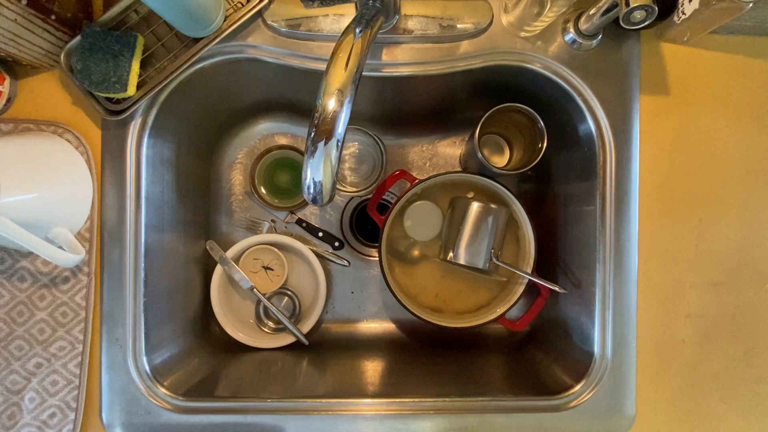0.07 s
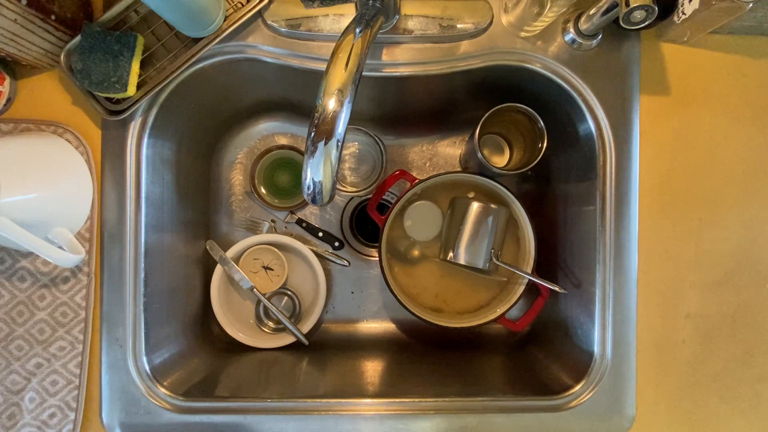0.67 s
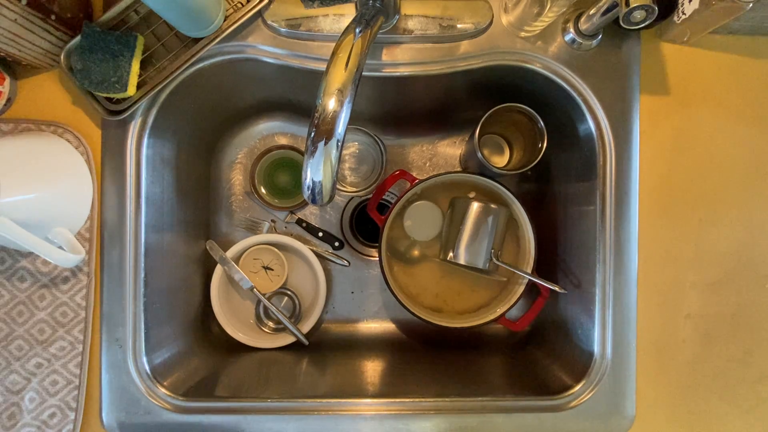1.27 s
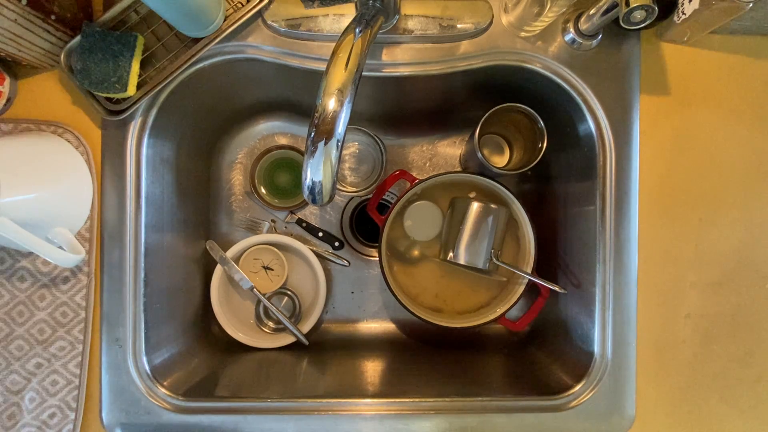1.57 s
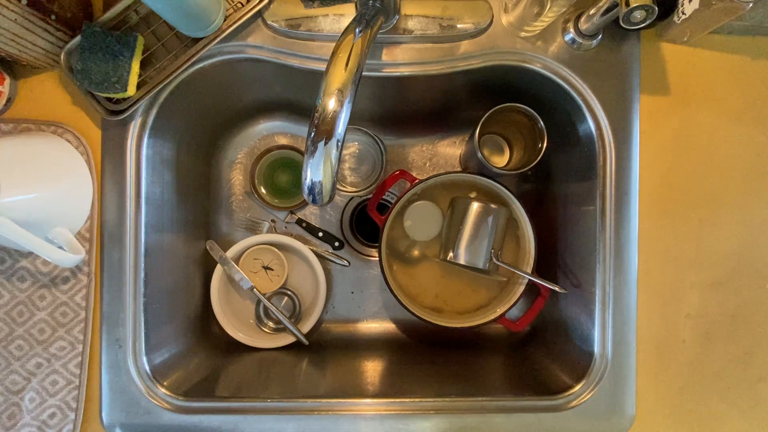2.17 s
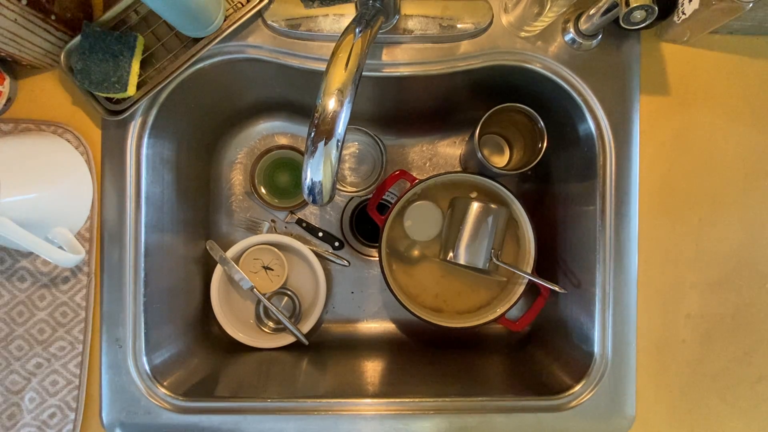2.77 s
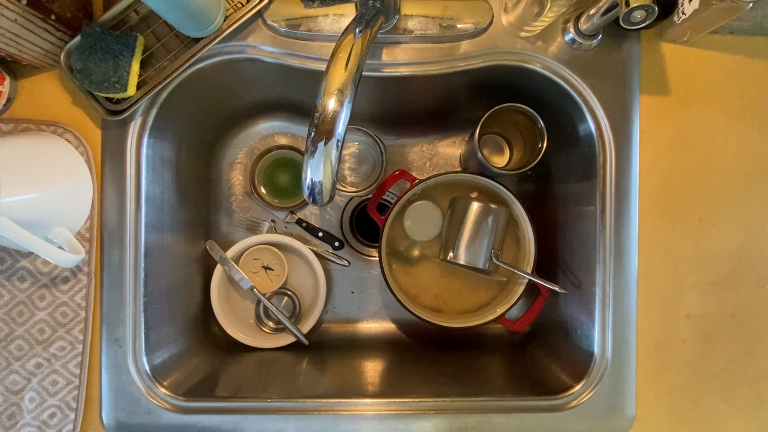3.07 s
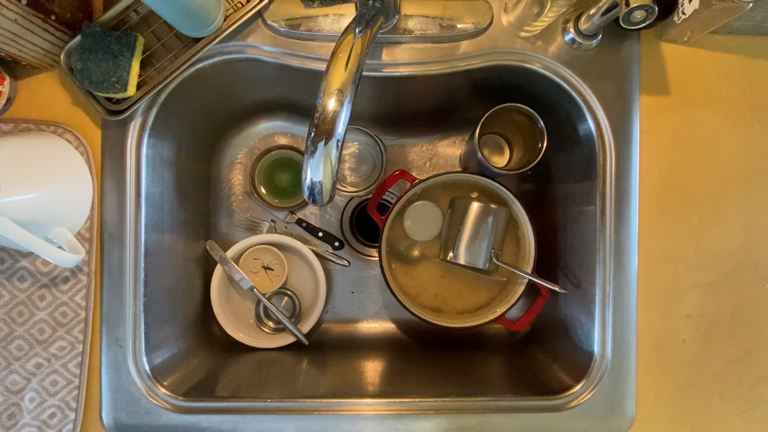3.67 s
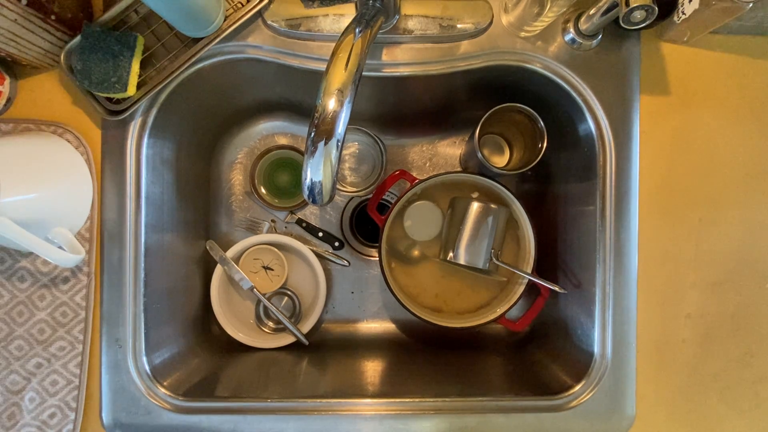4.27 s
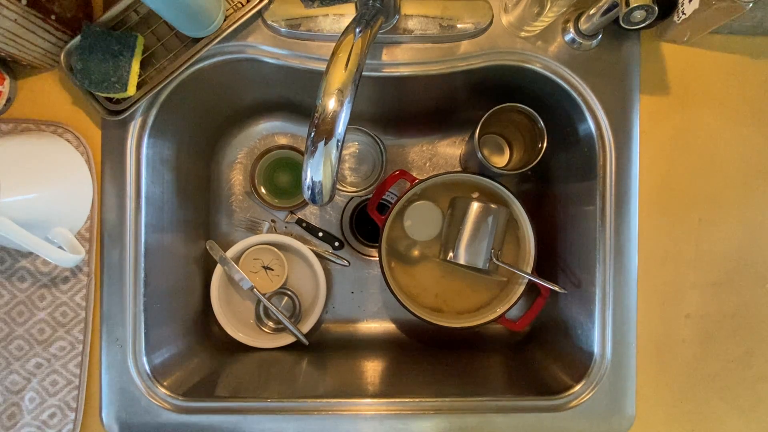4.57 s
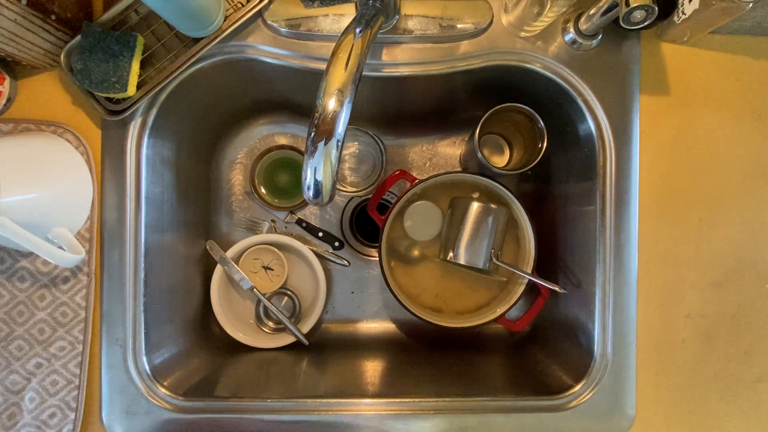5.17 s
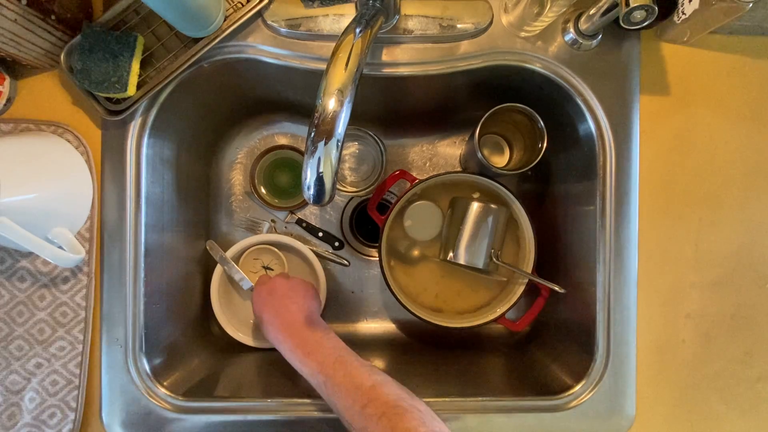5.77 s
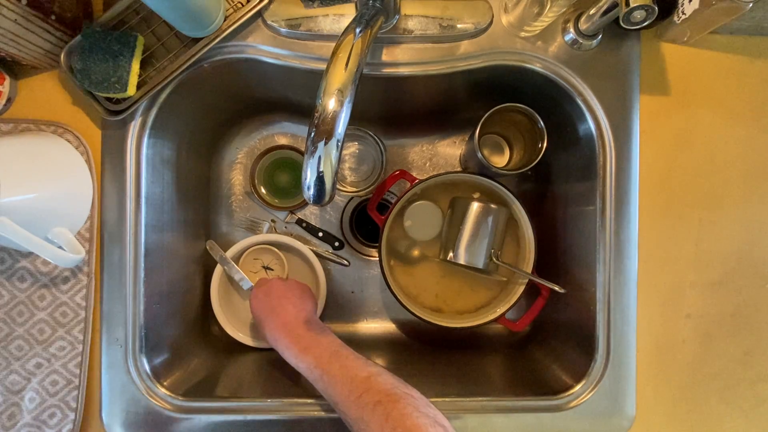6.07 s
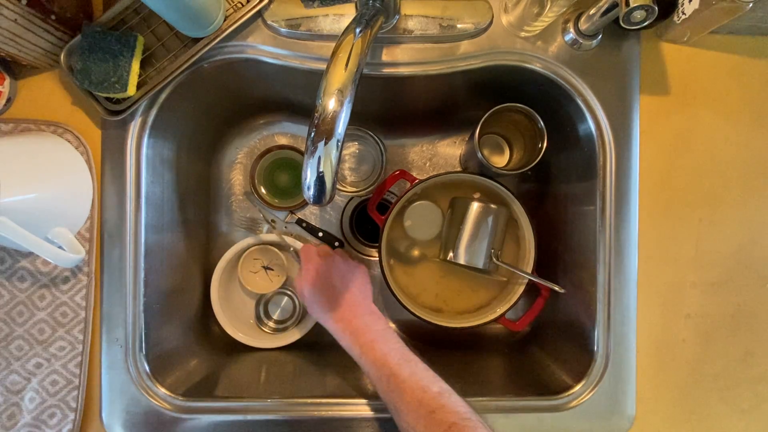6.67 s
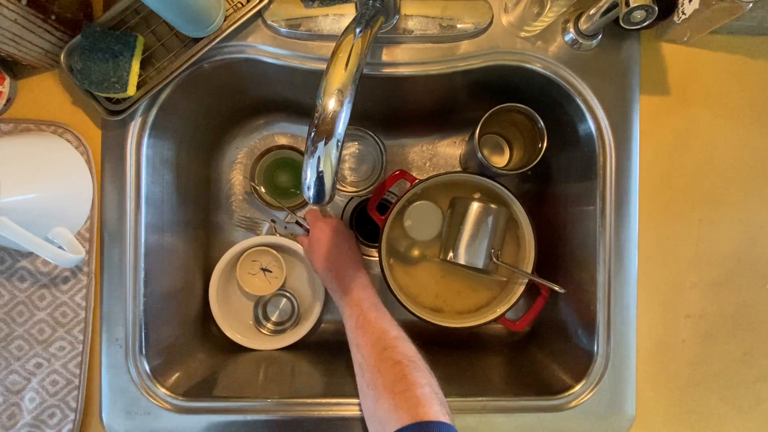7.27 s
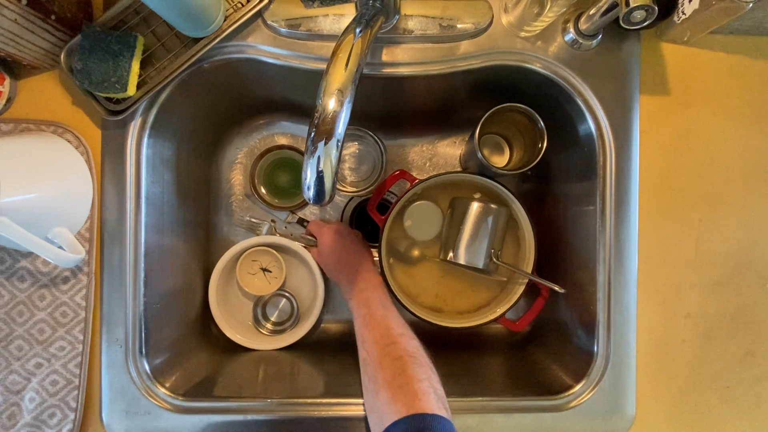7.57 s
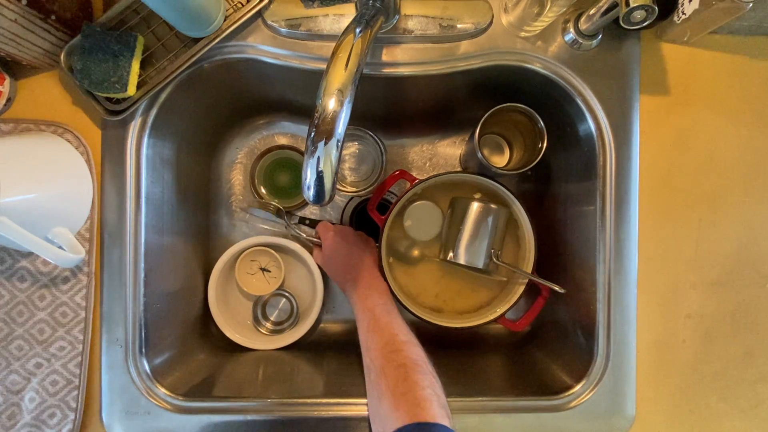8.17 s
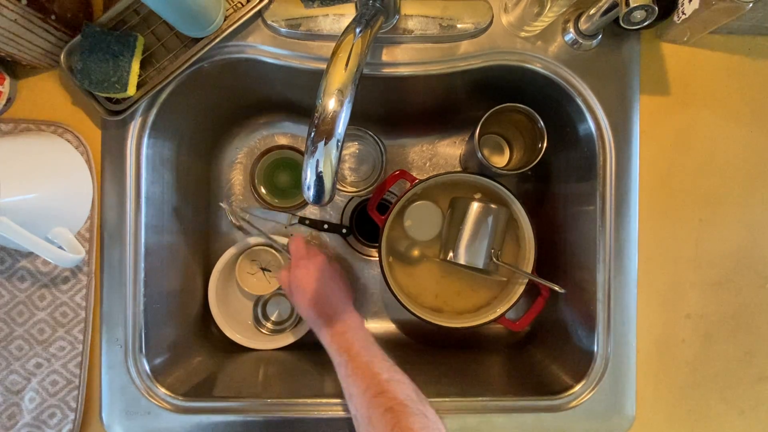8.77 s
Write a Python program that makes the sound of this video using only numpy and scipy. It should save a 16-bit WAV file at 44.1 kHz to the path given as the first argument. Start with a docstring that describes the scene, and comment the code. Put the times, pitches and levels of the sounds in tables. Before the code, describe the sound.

In a small kitchen, things knock inside a cupboard across the room and its wooden door thuds shut. Cutlery drops and jingles, plates slide and touch, and a china bowl rings briefly. After a soft sleeve swish and a pause, knives clink, tap and skid in a steel sink right by the microphone, making the basin boom. A faint mains hum and soft hush lie underneath.

```python
"""A small kitchen. Across the room a cupboard is bumped and shut; plates, a bowl and cutlery are
shifted about, with faint ticks and tinkles. A sleeve swishes. Then, close to two microphone ports,
a hand moves knives in a steel sink: blades clink and the basin booms. Blows are a burst of contact
noise plus decaying modes; scrapes are stick-slip noise. A mains hum and a soft hush fill the room."""
import sys
import numpy as np
from scipy import signal
from scipy.fft import rfft, irfft, next_fast_len
from scipy.io import wavfile

SR = 44100
rng = np.random.default_rng(int(sys.argv[2]) if len(sys.argv) > 2 else 0)


def digitize_waveform(pressure):
    """Quantize a signal to 16-bit integers and store it at the path in sys.argv[1].

    Rows of a 2-D input are taken as channels; values are limited to [-1, 1].
    """
    field = np.atleast_2d(pressure).T
    bounded = np.clip(field, -1, 1)
    quanta = np.round(bounded * 32767).astype(np.int16)
    wavfile.write(sys.argv[1], SR, quanta)


N = 397782
SIZE = 32768  # samples per event
T = np.arange(SIZE) / SR
FREQ = np.maximum(np.fft.rfftfreq(SIZE, 1 / SR), 1)
OVERTONE_COUNT, OVERTONE_LOW_HZ, OVERTONE_HIGH_HZ = 110, 600, 15500
HARDNESS_KNEE_HZ = 1480  # contact hardness tilts the clatter above this
THUD_BELOW_HZ = 276  # support thuds below, object clatters above
THUD_RISE_S, THUD_T60_S, THUD_DB_PER_DB, USUAL_BLOW_DB = 0.0075, 0.13, 0.62, -35

# Room hush: freq_hz, gain_db
HUSH_SPECTRUM = [(30, -9.5), (55, 3), (90, 3.5), (150, -6.5), (230, -11), (400, -5), (600, -10.5),
                 (1000, -16), (1600, -22), (2100, -22), (2700, -35), (4200, -38), (6500, -45), (9000, -51),
                 (15000, -60)]
# Mains hum: pitch_hz, level_db
HUM_PARTIALS = [(119.6, -56), (182, -70), (360.5, -64), (401, -73.5), (474, -67.5)]
# Room decay: freq_hz, t60_s
ROOM_DECAY = [(100, 0.54), (400, 0.38), (1200, 0.42), (3000, 0.27), (7000, 0.33), (15000, 0.14)]
# Likeness of the ports in diffuse sound: freq_hz, correlation
PORT_COHERENCE = [(150, 0.92), (330, 0.71), (600, -0.18), (1200, -0.6), (2000, 0.049), (5000, 0.071),
                  (7500, 0.35), (10000, 1), (14000, 0.97)]
# Device body between the ports: freq_hz, left_lead_rad, left_minus_right_db
PORT_SHADING = [(100, 0.24, -2.5), (447, 0.99, -1.5), (905, 0.05, 3.5), (1573, 0.92, 2), (2240, 1.2, -1),
                (3550, 1.7, -0.5), (6530, 1.86, -3.5), (8040, 2.1, 3), (9300, 3.1, 0.5), (11500, 3.2, 1),
                (14290, 4.1, -1)]

# Contact noise by material: freq_hz, gain_db
WOOD_SPECTRUM = [(40, -21), (100, 2), (170, -10.5), (260, -13), (420, -3.5), (520, -2.5), (630, -11),
                 (780, -6.5), (1000, -15.5), (2000, -19.5), (4000, -29), (8000, -36), (15000, -46)]
DISH_SPECTRUM = [(40, -15), (100, 1), (220, -27.5), (400, -5.5), (750, 3), (1500, -2), (3000, -2),
                 (4300, -11), (6200, -14), (8000, -23), (10000, -50), (13500, -32.5), (15500, -53.5)]
STEEL_SPECTRUM = [(40, -13.5), (120, 13), (400, 1.5), (700, -1.5), (1500, -3), (3000, -3), (5500, -7),
                  (8000, -14.5), (11000, -18.5), (15000, -22.5)]

# Modes of each object: pitch_hz, gain_db, t60_s
TINKLE_MODES = [(3540, -4, .14), (4500, -12, .12), (5750, -2, .07)]
CUPBOARD_MODES = [(113, -4, .28), (151, -3, .24), (221, -11, .22), (350, -5, .15), (415, 0, .14),
                  (479, -7, .18), (1168, -14, .12)]
MUG_MODES = [(927, 0, 0.11), (1685, 2, 0.11), (2050, 4, 0.17), (3250, -7, 0.09)]
CUP_MODES = [(915, 0, .13), (960, -8, .2), (1642, -6, .1), (2460, -7, .22)]
FORK_MODES = [(824, -8, .25), (1560, -6, .2), (2110, -6, .2), (2850, -2, .2), (3980, -2, .16),
              (4075, -3, .14), (4479, -11, .2), (4900, -10, .2), (7850, -10, .2)]
SPOON_MODES = [(2013, 1, .18), (2110, -3, .15), (3042, -2, .27), (3375, -9, .25), (5480, -6, .3),
               (6385, -12, .24), (7192, -18, .2), (7827, -16, .17)]
TEASPOON_MODES = [(2789, -5, .23), (3050, -3, .24), (3112, 0, .22), (5593, -24, .25), (7811, -20, .18)]
CUTLERY_MODES = [(1529, -11, .25), (2191, -6, .2), (2443, -5, .22), (2510, -5, .2), (2785, -6, .22),
                 (2981, -4, .25), (3052, -2, .26), (3206, -4, .24), (3849, -7, .22), (5216, -9, .2),
                 (5593, -6, .22), (6040, -6, .23), (6340, -5, .23), (7130, -11, .22), (7843, -13, .2),
                 (12810, -23, .3), (14430, -26, .2)]
PLATE_MODES = [(1530, -3, .2), (1600, -3, .12), (1680, -1, .14), (3210, -5, .22), (3420, -10, .13),
               (3990, -6, .2), (4960, -13, .22), (5520, -16, .2), (7830, -22, .15)]
BOWL_MODES = [(813, -20, .5), (1496, 0, .9), (1545, -11, .15), (2073, -14, .18), (3440, -21, .45),
              (3940, -13, .6), (4474, -22, .45), (4931, -25, .4), (7397, -29, .3)]
BASIN_MODES = [(84, -19, .35), (105, -6, .26), (159, 0, .22), (210, -12, .15), (297, -17, .18),
               (370, -12, .25), (416, -19, .3), (510, -25, .2)]
HANDLE_MODES = [(2930, -14, 0.042), (2970, 12, 0.046), (4230, -5, 0.044)]
KNIFE_MODES = [(1319, -3, .2), (3172, 1, .2), (3090, -3, .08), (3920, -7, .14), (5453, -14, .24),
               (5720, -7, .08), (8199, -16, .16), (14100, -10, .053)]
BLADE_MODES = [(1360, -7.5, 0.073), (2730, -6.5, 0.11), (2800, -9, 0.3), (4770, -3, 0.068),
               (5660, 7.5, 0.018), (6320, 4.5, 0.11), (6390, 5, 0.063), (9150, -2, .12), (11900, -2, 0.086),
               (12900, -2, 0.04)]
TIP_MODES = [(1940, -6.5, 0.22), (3980, -8, 0.74), (5420, 11, 0.064), (6860, -4, 0.15), (7420, 10.5, 0.21),
             (8000, 11, 0.19), (11220, 16.5, 0.092), (13310, 14, 0.12)]
SINK_MODES = [(857, -8.5, 0.67), (1116, -11.5, 0.61), (1336, 8, 0.51), (2647, 19, 0.061), (3000, 0.5, 0.22),
              (3860, 8.5, 0.12), (4720, 2, 0.15)]

# Friction strokes: start_s, length_s, level_db
SLEEVE_STROKES = [(5.03, .11, -63.5), (5.35, .11, -64), (5.63, 0.29, -52.5)]  # arm reaches in
SHELF_STROKES = [(.24, 0.35, -53.5), (3.76, 0.26, -51), (4.15, .17, -41.5)]  # heavy dishes on wood
DISH_STROKES = [(1.87, 0.15, -43.5), (3.41, 0.29, -57), (3.735, 0.089, -41.5), (4.135, 0.21, -47)]  # dishes and cutlery slide over each other
KNIFE_STROKES = [(8.158, 0.035, -51), (8.21, 0.089, -37.5), (8.34, .11, -47)]  # knife skids on the sink floor

# Blows: start_s, level_db, hardness_db_per_oct, ring_offset_db
CUPBOARD_HITS = [(0.2092, -32.5, 2, -22), (0.3004, -36.5, -3, -8), (0.4201, -38.5, 4.5, -25),
                 (0.4688, -42, 6, 3.5)]  # things knock about inside
DOOR_HITS = [(.8522, -19, -5, -1), (.8595, -22.5, -18, 1), (.9581, -49, -24, 6)]  # shuts, rebounds
MUG_HITS = [(0.647, -36, 2, -2)]  # clacks against a dish
CUP_HITS = [(0.0817, -47, -12, -2), (1.683, -33, 1, 3)]  # set down
FORK_HITS = [(1.846, -34.5, 4, -3), (1.942, -31.5, 0.5, -2)]  # nudged
SPOON_HITS = [(2.0005, -32, -0.5, 6)]  # knocks against dishes
TEASPOON_HITS = [(2.652, -41.5, -1.5, 3), (2.692, -41, -9.5, -17)]  # pings, settles
CUTLERY_HITS = [(2.151, -30, -2.5, -16.5), (2.198, -21.5, 5.5, -8), (2.2055, -15.5, 3.5, 0),
                (2.32, -33, -0.5, -30), (2.3982, -32.5, -2, -24), (2.5419, -37.5, -7, -23),
                (2.8641, -42, -15, -21), (4.1265, -23.5, 2, -7.5), (4.1595, -26, 6, -21),
                (4.3426, -38, -3.5, -10)]  # drops, settles
PLATE_HITS = [(3.0869, -43, -9, -5), (3.471, -36.5, -17.5, -8.5), (3.5544, -42.5, -22, 6.5),
              (3.725, -29.5, 2.5, 1), (3.909, -29.5, -1, -3.5), (4.5145, -31, -4, -4.5),
              (5.132, -50.5, -17.5, -15)]  # plates touch
BOWL_HITS = [(3.8235, -32.5, -8, -12), (3.828, -30, 3, 8.5)]
KNIFE_HITS = [(6.2275, -54.5, -19, -11), (7.1322, -59.5, -6, 2), (7.7005, -29.5, 3, -3),
              (7.7065, -39.5, -6.5, 12.5), (8.2075, -26.5, 0, -28)]  # knocked on the flat
BLADE_HITS = [(7.8694, -28.5, 3, 6.5), (7.9738, -33, 3.5, 15.5)]  # blade on blade
TIP_HITS = [(8.5289, -30.5, 14, 0.5), (8.7122, -43.5, 10, 1)]  # knife tip flicked
SINK_HITS = [(7.3205, -25, -1.5, -12), (7.3265, -24.5, -9, -17.5), (7.3388, -22.5, -10, -37),
             (7.4219, -42.5, -5, -11.5), (7.9825, -28.5, -5.5, -32), (8.0314, -30.5, 5, -32),
             (8.0565, -40.5, 11, -11), (8.1604, -39, -9.5, -9), (8.236, -33, -18.5, -11),
             (8.2616, -26, -19.5, -15), (8.3315, -32, -0.5, -0.5), (8.8423, -53, 4, -15)]  # knives on the sink floor

# Pushes on the sink floor: start_s, level_db, hardness_db_per_oct
FLOOR_PUSHES = [(7.322, -8, -0.5), (7.98, -27.5, 2.5), (8.158, -22.5, 0), (8.275, -12, -12)]
# Dead taps of a knife handle: start_s, level_db, pitch_hz, decay_s
DEAD_TAPS = [(8.2496, -35, 3700, 0.0004), (8.257, -7.5, 3640, 0.0003), (8.314, -25.5, 2750, 0.0011),
             (8.3677, -37.5, 2680, 0.0013), (8.4201, -43.5, 2600, 0.003)]


def undb(db):
    """Decibels to gain."""
    return 10 ** (np.asarray(db) / 20)


def along(points, hz, column=1):
    """Table column interpolated over log frequency."""
    table = np.array(points, float)
    return np.interp(np.log(np.maximum(hz, 1)), np.log(table[:, 0]), table[:, column])


def fade(t60_s):
    """Exponential decay, 60 dB in t60_s."""
    return np.exp(-np.log(1000) * T / t60_s)


def rise(rise_s):
    """Exponential attack."""
    return 1 - np.exp(-T / rise_s)


def wander(count):
    """Random line through count points over one event."""
    return np.interp(T, np.linspace(0, T[-1], count), rng.standard_normal(count))


def add(track, start_s, sound):
    """Mix a sound into a track."""
    start = int(start_s * SR)
    track[start:start + len(sound)] += sound[:N - start]


def causal(gain):
    """Minimum-phase spectrum shaped like gain, mean power 1: nothing precedes the blow."""
    gain = gain / np.sqrt(np.mean(gain ** 2))
    cepstrum = irfft(np.log(gain + 1e-9))
    cepstrum[1:SIZE // 2] *= 2
    cepstrum[SIZE // 2 + 1:] = 0
    return np.exp(rfft(cepstrum))


def diffuse(size):
    """Spectra of noise reaching both ports from all sides, and their frequencies."""
    hz = np.fft.rfftfreq(size, 1 / SR)
    alike = along(PORT_COHERENCE, hz)
    mid, side = rfft(rng.standard_normal((2, size))) * np.sqrt([(1 + alike) / 2, (1 - alike) / 2])
    return np.array([mid + side, mid - side]), hz


def in_room(source, direct_db, echo_db):
    """Direct sound plus wall echo; each octave dies at its own rate."""
    noise, hz = diffuse(SIZE)
    centres_hz = np.geomspace(60, 15360, 9)
    response = 0
    for centre_hz, pick in zip(centres_hz, np.eye(len(centres_hz))):
        octave = irfft(noise * np.interp(hz, centres_hz, pick))
        decay = fade(along(ROOM_DECAY, centre_hz)) * rise(0.0093)
        response = response + octave * decay / np.linalg.norm(decay)
    echo = signal.fftconvolve(source[None], response, axes=1)[:, :N]
    return undb(direct_db) * source + undb(echo_db) * echo


def ring(modes, hardness_db_per_oct=0, scatter_db=2, flutter=0, rough=0):
    """Decaying modes, reweighted per blow. Loose pieces flutter; chatter on neighbours roughens them."""
    hz, db, t60_s = np.transpose(modes)
    tilt_db = hardness_db_per_oct * np.log2(hz / hz[0])
    gains = undb(db + tilt_db + scatter_db * rng.standard_normal(len(hz)))
    gains *= rng.choice([-1, 1], len(hz)) * np.sqrt(2) / np.linalg.norm(gains)
    out = 0
    for pitch_hz, gain, mode_t60_s in zip(hz, gains, t60_s):
        tremble = 1 + flutter * wander(40) + rough * wander(220)
        out = out + gain * tremble * np.sin(2 * np.pi * pitch_hz * T) * fade(mode_t60_s)
    return out


def overtones(t60_s):
    """Spectrum of the many weak, irregular overtones of a dish or blade."""
    slots = (np.arange(OVERTONE_COUNT) + rng.random(OVERTONE_COUNT)) / OVERTONE_COUNT
    hz = np.interp(slots, [0, 1], np.sqrt([OVERTONE_LOW_HZ, OVERTONE_HIGH_HZ])) ** 2
    spikes = np.zeros(len(FREQ))
    spikes[(hz * SIZE / SR).astype(int)] = rng.choice([-1, 1], OVERTONE_COUNT) * hz ** 0.25
    response = rfft(irfft(spikes) * fade(t60_s))
    return response / np.sqrt(np.mean(abs(response[FREQ < OVERTONE_HIGH_HZ]) ** 2))


def contact(gain, t60_s, rise_s, grain=0.43):
    """Spectrum of a dying rattle of tiny contacts, coloured by gain."""
    chatter = np.repeat(np.exp(grain * rng.standard_normal(SIZE // 64) - grain ** 2), 64)
    force = chatter * fade(t60_s) * rise(rise_s)
    return rfft(rng.standard_normal(SIZE) * force) * causal(gain)


def struck(hits, modes, spectrum, thud_db, rattle_s, rise_s, metal,
           metal_t60_s=0.12, flutter=0.5, rough=0):
    """Blows on one object as [clatter + thud, ringing]; metal is the clatter's share in overtones."""
    noise, tone = np.zeros((2, N))
    share = metal / (1 + (OVERTONE_LOW_HZ / FREQ) ** 10)
    colour = undb(along(spectrum, FREQ))
    low = colour / np.sqrt(1 + (FREQ / THUD_BELOW_HZ) ** 10)
    high = colour / np.sqrt(1 + (THUD_BELOW_HZ / FREQ) ** 10)
    octaves = np.log2(np.hypot(1, FREQ / HARDNESS_KNEE_HZ))
    for start_s, db, hardness_db_per_oct, ring_offset_db in hits:
        body = np.sqrt(1 - share) + np.sqrt(share) * overtones(metal_t60_s)
        clatter = undb(db) * contact(high * undb(hardness_db_per_oct * octaves), rattle_s, rise_s) * body
        thud_gain = undb(thud_db + THUD_DB_PER_DB * (db - USUAL_BLOW_DB))
        thud = thud_gain * contact(low, THUD_T60_S, THUD_RISE_S)
        ringing = ring(modes, flutter=flutter, rough=rough) * rise(rise_s)
        add(noise, start_s, irfft(clatter + thud))
        add(tone, start_s, undb(db + ring_offset_db) * ringing)
    return np.array([noise, tone])


def friction(strokes, grain):
    """Noise that swells and dies with each stroke; grain makes it catch and slip."""
    out = np.zeros(N)
    for start_s, length_s, db in strokes:
        swell = np.sin(np.pi * np.minimum(T / length_s, 1))
        grip = np.exp(grain * wander(220) - grain ** 2)
        add(out, start_s, undb(db) * swell * grip * rng.standard_normal(SIZE))
    return out


def scraped(strokes, spectrum, metal_t60_s):
    """Stick-slip keeps the overtones of a dish or blade ringing."""
    body = irfft(causal(undb(along(spectrum, FREQ))) * overtones(metal_t60_s))
    return signal.fftconvolve(friction(strokes, grain=1.0), body)[:N]


def room_tone(hush_db=-55.5, hum_trim_db=-1, waver=0.15):
    """An appliance's wavering mains hum over a soft hush."""
    noise, hz = diffuse(N)
    hush = irfft(noise * undb(along(HUSH_SPECTRUM, hz)), N)
    t = np.arange(N) / SR
    knots_s = np.linspace(0, N / SR, 40)
    hum = 0
    for pitch_hz, db in HUM_PARTIALS:
        drift = rng.standard_normal(len(knots_s)) + 1j * rng.standard_normal(len(knots_s))
        sway = 1 + waver * np.interp(t, knots_s, drift)
        partial = np.exp(2j * np.pi * (pitch_hz * t + rng.random()))
        hum = hum + np.sqrt(2) * undb(db) * np.real(sway * partial)
    return undb(hush_db) * hush / hush.std() + undb(hum_trim_db) * hum


def small_ticks(count=55, span_s=3.7, loudest_db=-52.5, spread_db=4, low_hz=8000):
    """A sizzle of faint bright ticks, dense at first, then thinning."""
    out = np.zeros(N)
    for when, size in rng.random((count, 2)):
        tick = rng.standard_normal(SIZE) * fade(0.051) * rise(0.0034)
        add(out, span_s * when ** 2, undb(loudest_db + spread_db * np.log(size)) * tick)
    highpass = signal.butter(2, low_hz, "high", fs=SR, output="sos")
    return in_room(signal.sosfilt(highpass, out), direct_db=0, echo_db=-16.5)


def tinkling(count=16, span_s=2.4, level_db=-63):
    """A loose piece trembles and tinkles at odd moments."""
    out = np.zeros(N)
    for slot, jitter in enumerate(rng.random(count)):
        note = ring(TINKLE_MODES, scatter_db=3, flutter=0.39, rough=0.35) * rise(0.0064)
        add(out, span_s * (slot + jitter) / count, undb(level_db) * note)
    return in_room(out, direct_db=0, echo_db=-3)


def sleeve(band_hz=(2000, 5200)):
    """Cloth brushes cloth: a smooth, soft hiss."""
    bandpass = signal.butter(1, band_hz, "band", fs=SR, output="sos")
    return signal.sosfilt(bandpass, friction(SLEEVE_STROKES, grain=0.248))


def shelf():
    """Dragged dishes judder; the shelf rumbles under them."""
    board = irfft(causal(undb(along(WOOD_SPECTRUM, FREQ))))
    rumble = signal.fftconvolve(friction(SHELF_STROKES, grain=0.68), board)[:N]
    return in_room(rumble, direct_db=-4, echo_db=-8)


def door():
    """A cupboard door shuts with a compact wooden thud."""
    noise, tone = struck(DOOR_HITS, CUPBOARD_MODES, WOOD_SPECTRUM,
                         thud_db=-27.5, rattle_s=0.16, rise_s=0.00088, metal=0)
    return in_room(noise, direct_db=-1.5, echo_db=-8.5) + tone


def far_dishes():
    """Cupboard, cutlery and crockery knock across the room; the clatter arrives mostly as echo."""
    noise, tone = (
        struck(CUPBOARD_HITS, CUPBOARD_MODES, WOOD_SPECTRUM,
               thud_db=-39, rattle_s=0.042, rise_s=0.0012, metal=0.022)
        + struck(MUG_HITS, MUG_MODES, DISH_SPECTRUM,
                 thud_db=-47, rattle_s=0.04, rise_s=0.0018, metal=0.12, rough=1.0)
        + struck(CUP_HITS, CUP_MODES, DISH_SPECTRUM,
                 thud_db=-42.5, rattle_s=0.049, rise_s=0.005, metal=0.1, rough=0.33)
        + struck(FORK_HITS, FORK_MODES, DISH_SPECTRUM,
                 thud_db=-40.5, rattle_s=0.066, rise_s=0.011, metal=0.4, rough=1.0)
        + struck(SPOON_HITS, SPOON_MODES, DISH_SPECTRUM,
                 thud_db=-45.5, rattle_s=0.099, rise_s=0.0019, metal=0.7, rough=0.35)
        + struck(TEASPOON_HITS, TEASPOON_MODES, DISH_SPECTRUM,
                 thud_db=-43, rattle_s=0.09, rise_s=0.006, metal=0.17, rough=1.0)
        + struck(CUTLERY_HITS, CUTLERY_MODES, DISH_SPECTRUM,
                 thud_db=-42, rattle_s=0.053, rise_s=0.0048, metal=0.35, rough=0.94)
        + struck(PLATE_HITS, PLATE_MODES, DISH_SPECTRUM,
                 thud_db=-42, rattle_s=0.061, rise_s=0.005, metal=0.22, rough=0.71))
    noise += scraped(DISH_STROKES, DISH_SPECTRUM, metal_t60_s=0.09)
    return in_room(noise, direct_db=-0.5, echo_db=5) + in_room(tone, direct_db=-4.5, echo_db=-6.5)


def bowl(damping_s=0.17):
    """A struck china bowl holds its note, then is damped as it comes to rest."""
    noise, tone = struck(BOWL_HITS, BOWL_MODES, DISH_SPECTRUM,
                         thud_db=-35.5, rattle_s=0.071, rise_s=0.0023, metal=0.52, flutter=0.3, rough=0.095)
    age_s = np.maximum(np.arange(N) / SR - BOWL_HITS[-1][0], 0)
    tone *= np.exp(-(age_s / damping_s) ** 3)
    return in_room(noise, direct_db=-2, echo_db=3) + in_room(tone, direct_db=-1, echo_db=-7.5)


def basin(swell_s=0.012):
    """The thin sink floor swings up, then booms; a soft push wakes only its lowest modes."""
    out = np.zeros(N)
    for start_s, db, hardness_db_per_oct in FLOOR_PUSHES:
        boom = ring(BASIN_MODES, hardness_db_per_oct, scatter_db=5.5) * rise(swell_s)
        add(out, start_s, undb(db) * boom)
    return out


def handle(buzz_db=-25, ring_db=-34, tail_db_per_db=0.46, buzz_hz=3000, half_width_oct=0.51):
    """A gripped handle taps steel: a quickly damped click, then the knife buzzes and rings briefly."""
    out = np.zeros(N)
    band = 1 / (1 + (np.log2(FREQ / buzz_hz) / half_width_oct) ** 4)
    for start_s, db, pitch_hz, decay_s in DEAD_TAPS:
        age = T / decay_s
        click = age * np.exp(1 - age) * np.sin(2 * np.pi * pitch_hz * T)
        buzz = irfft(contact(band, t60_s=0.055, rise_s=decay_s))
        tail = undb(buzz_db) * buzz + undb(ring_db) * ring(HANDLE_MODES)
        add(out, start_s, undb(db) * click + undb(tail_db_per_db * db) * tail)
    return in_room(out, direct_db=2.5, echo_db=-13.5)


def knives():
    """Knives hit each other and skid in the sink, just under the microphone."""
    noise, tone = (
        struck(KNIFE_HITS, KNIFE_MODES, STEEL_SPECTRUM,
               thud_db=-40, rattle_s=0.056, rise_s=0.00059, metal=1.0, metal_t60_s=0.011)
        + struck(BLADE_HITS, BLADE_MODES, STEEL_SPECTRUM,
                 thud_db=-43, rattle_s=0.055, rise_s=0.00043, metal=0.69, metal_t60_s=0.14)
        + struck(TIP_HITS, TIP_MODES, STEEL_SPECTRUM,
                 thud_db=-45, rattle_s=0.12, rise_s=0.00074, metal=0.97, metal_t60_s=0.061)
        + struck(SINK_HITS, SINK_MODES, STEEL_SPECTRUM,
                 thud_db=-43.5, rattle_s=0.09, rise_s=0.0012, metal=0.6, metal_t60_s=0.075))
    noise += scraped(KNIFE_STROKES, STEEL_SPECTRUM, metal_t60_s=0.033)
    return in_room(noise, direct_db=1, echo_db=-8) + tone


def scene():
    """Far cupboard and dishes, near sink, room tone."""
    far = door() + shelf() + far_dishes() + bowl() + small_ticks() + tinkling()
    near = sleeve() + knives() + handle() + basin()
    return far + near + room_tone()


def record(dry, low_cut_hz=52, high_cut_hz=15900):
    """Treble reaches the left port first; the body shades each port; rumble and top are cut."""
    size = next_fast_len(N + SIZE)
    hz = np.fft.rfftfreq(size, 1 / SR)
    split = np.array([[0.5], [-0.5]])
    shade = undb(split * along(PORT_SHADING, hz, column=2))
    lead_rad = split * along(PORT_SHADING, hz, column=1)
    heard = irfft(rfft(dry, size) * shade * np.exp(1j * lead_rad), size)[:, :N]
    highpass = signal.butter(2, low_cut_hz, "high", fs=SR, output="sos")
    lowpass = signal.ellip(8, 0.2, 70, high_cut_hz, fs=SR, output="sos")
    return signal.sosfilt(lowpass, signal.sosfilt(highpass, heard))


dry = scene()
out = record(dry)
digitize_waveform(out)
```